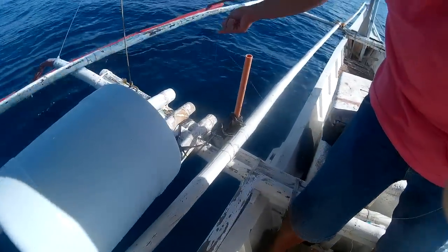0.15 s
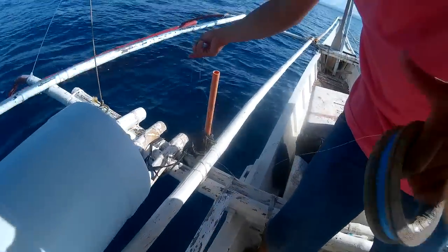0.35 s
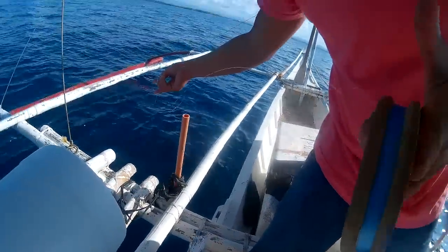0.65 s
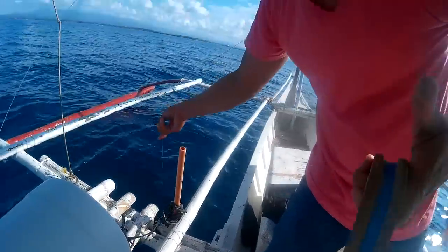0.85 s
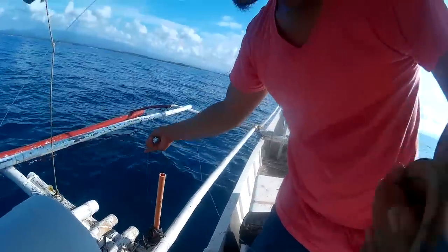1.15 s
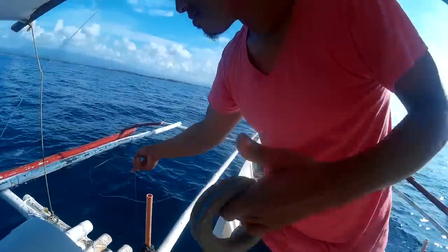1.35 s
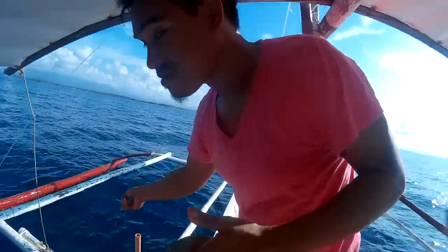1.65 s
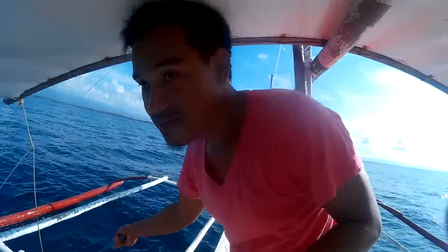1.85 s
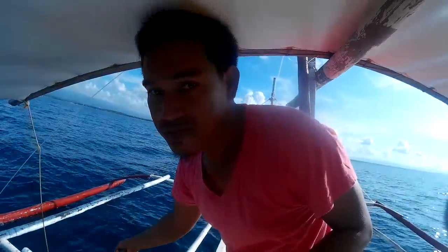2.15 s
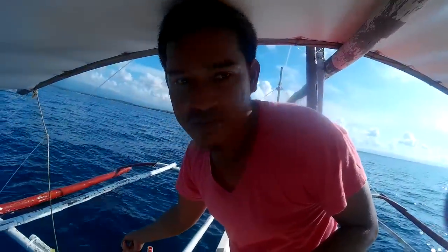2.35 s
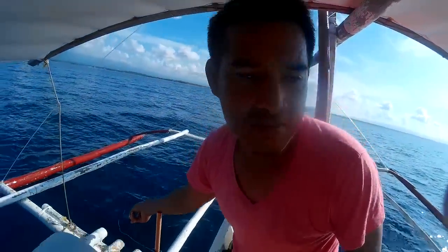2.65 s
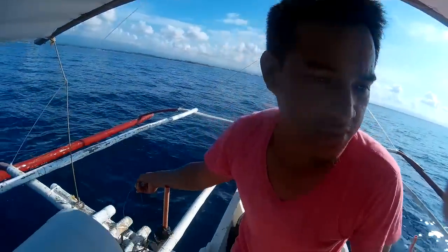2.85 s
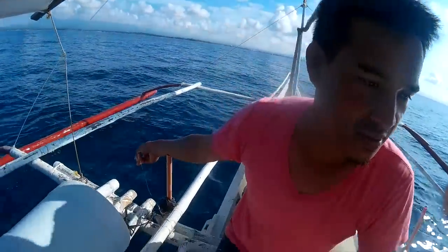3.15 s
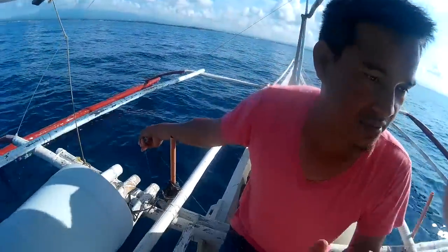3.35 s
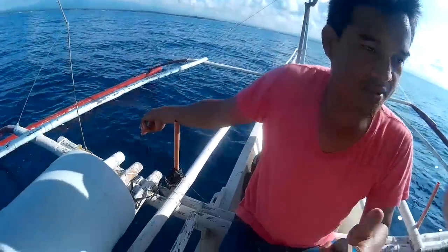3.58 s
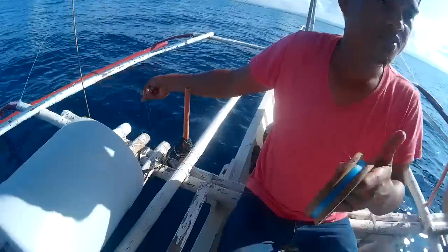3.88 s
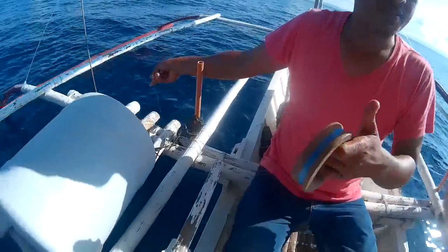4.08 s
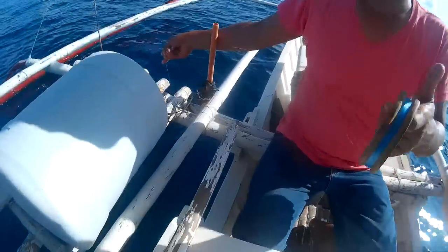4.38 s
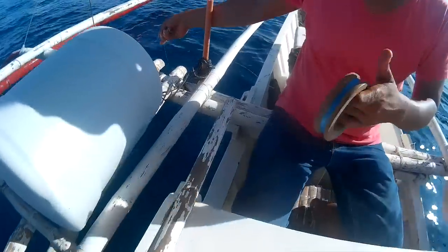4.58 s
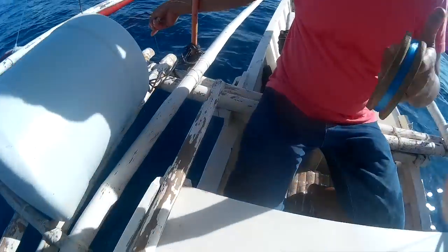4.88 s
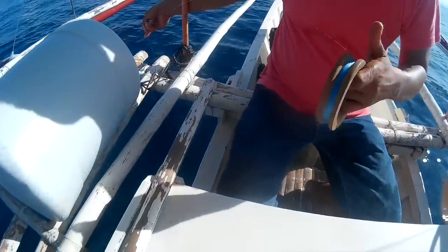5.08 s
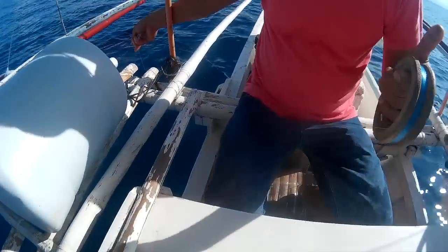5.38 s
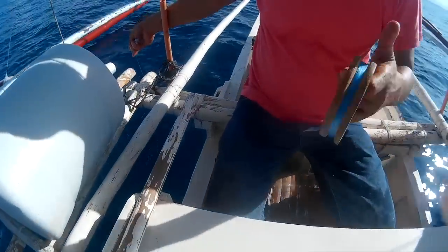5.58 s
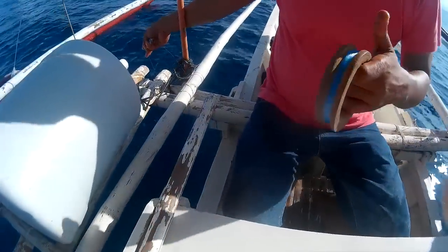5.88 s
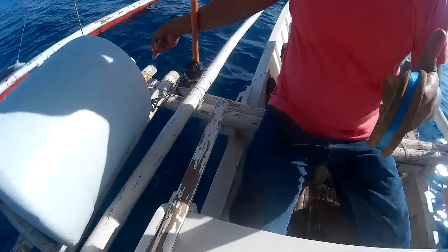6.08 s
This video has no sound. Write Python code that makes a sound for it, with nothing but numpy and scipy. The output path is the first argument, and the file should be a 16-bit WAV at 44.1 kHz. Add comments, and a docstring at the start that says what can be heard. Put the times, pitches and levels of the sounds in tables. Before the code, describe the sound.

Quiet water laps, splashes and bubbles against a small wooden boat, with two sharp, dry knocks close by.

```python
"""On a calm sea, in open air without echo, a small wooden outrigger drifts.
Wavelets wash and slap along the hull, throwing spray and trapping air that rings as bubbles.
Two sharp, dry knocks sound close by, each an impulse exciting heavily damped modes; later a large
air pocket gurgles, its resonance rising as it shrinks. A faint rumble and a thin hiss lie under it all."""
import sys
import numpy as np
from scipy import signal
from scipy.fft import rfft, irfft
from scipy.io import wavfile
from scipy.ndimage import uniform_filter1d

SR = 44100
rng = np.random.default_rng(int(sys.argv[2]) if len(sys.argv) > 2 else 0)


def int16_out(signal):
    """Quantize to a 16-bit WAV file."""
    q = np.round(np.clip(np.atleast_2d(signal).T, -1, 1) * 32767)
    wavfile.write(sys.argv[1], SR, q.astype(np.int16))


N = 274743
TIME = np.arange(N) / SR

# spectra of large bubbles, small bubbles and spray: (frequency [Hz], relative level [dB])
GULP_SPECTRUM = [(100, -14), (230, -3.5), (430, 0), (800, -3.5), (1100, -7.5), (1800, -28)]
SPLASH_SPECTRUM = [(600, -24), (1000, -4), (1450, -0.5), (1950, -1), (2700, -4), (3400, -15.5), (5000, -11),
                   (6200, -24.5), (8000, -35.5)]
SPRAY_SPECTRUM = [(2400, -19.5), (3200, -4), (4100, -4.5), (5200, 0), (7000, -8.5), (8200, -4.5),
                  (9300, -10), (10700, -6.5), (13000, -11.5), (16000, -14)]


def from_db(db):
    """Amplitude ratio: a factor of ten for every 20 dB."""
    return 10 ** (np.asarray(db) / 20)


def unit_rms(x):
    """Normalisation to unit mean power."""
    return x / np.sqrt(np.mean(x ** 2) + 1e-20)


def coloured(x, spectrum):
    """Spectral shaping: gains interpolated over log frequency, the result at unit power."""
    hz, db = np.transpose(spectrum)
    log_hz = np.log(np.arange(N // 2 + 1) * SR / N + 1e-3)
    gain = from_db(np.interp(log_hz, np.log(hz), db, left=-60, right=-60))
    return unit_rms(irfft(rfft(x) * gain, N))


def cut(x, hz, kind, order):
    """Butterworth filtering: a low- or high-pass with a maximally flat passband."""
    return signal.sosfilt(signal.butter(order, hz, kind, fs=SR, output="sos"), x + 1e-18)


def resonance(x, hz, width_hz):
    """Forced response of a damped oscillator, with unit gain at its centre frequency."""
    radius = np.exp(-np.pi * width_hz / SR)
    feedback = [1, -2 * radius * np.cos(2 * np.pi * hz / SR), radius ** 2]
    return signal.lfilter(np.array([1, 0, -1]) * (1 - radius ** 2) / 2, feedback, x + 1e-18)


def grains(per_s, spread_db):
    """Shot noise: impulses at random moments, mostly small, a few large."""
    sizes = from_db(spread_db * np.minimum(rng.exponential(1, N), 4)) * rng.choice([-1, 1], N)
    return sizes * (rng.random(N) < per_s / SR)


def froth(spectrum, per_s, spread_db, q, count=28):
    """Superposition of bubble resonances of quality factor q, struck at random and levelled in power."""
    clicks, owner = grains(per_s, spread_db), rng.integers(0, count, N)
    pitches = np.geomspace(spectrum[0][0], spectrum[-1][0], count)
    ringing = sum(resonance(clicks * (owner == k), hz, hz / q) for k, hz in enumerate(pitches))
    swarm = coloured(ringing, spectrum)
    return swarm / np.sqrt(uniform_filter1d(swarm ** 2, size=900) + 1e-4)


def surge(age, rise_s, decay_s):
    """Envelope of a transient: a quick rise, then exponential decay."""
    return (1 - np.exp(-age / rise_s)) * np.exp(-age / decay_s)


def background(rumble_db, hiss_db):
    """Stationary noise: the low rumble of the open sea and the even hiss of the microphone."""
    # spectra of the two noises: (frequency [Hz], relative level [dB])
    rumble_spectrum = [(15, -1), (30, -2.5), (60, -0.5), (90, -2), (150, 0), (250, -7), (400, -11),
                       (800, -24.5), (2500, -38)]
    hiss_spectrum = [(100, 3), (2500, 0.5), (5000, -0.5), (8000, -.5), (14000, 0), (15500, -4),
                     (16200, -14)]
    rumble = from_db(rumble_db) * coloured(rng.standard_normal(N), rumble_spectrum)
    hiss = from_db(hiss_db) * coloured(rng.standard_normal(N), hiss_spectrum)
    return rumble + hiss


def swell_envelopes(calm_deep_db, calm_light_db):
    """Incoherent sources add in power: swells over the calm set the deep and light wash amplitudes."""
    # swells along the hull: (crest time [s], length [s], deep level [dB], light level [dB])
    swells = [(.008, 0.025, -68, -61.5), (0.076, .045, -70, -59), (0.222, 0.14, -75, -71.5),
              (0.488, 0.057, -74.5, -73.5), (0.86, 0.082, -75.5, -67.5), (1.235, 0.034, -66, -82),
              (2.038, 0.029, -82, -74.5), (2.673, 0.065, -80.5, -77.5), (2.998, .12, -84, -78.5),
              (3.368, .03, -88, -74.5), (3.647, 0.034, -80, -72.5), (3.897, 0.14, -78, -72.5),
              (4.117, 0.031, -68, -70.5), (4.492, 0.094, -74, -69.5), (4.997, 0.37, -79.5, -77.5),
              (5.781, 0.079, -68.5, -68.5), (6.207, .03, -79, -68.5)]
    deep_power, light_power = from_db(calm_deep_db) ** 2, from_db(calm_light_db) ** 2
    for crest, length, deep_db, light_db in swells:
        width_s = length * np.where(TIME < crest, 0.76, 0.89)   # builds faster than it drains
        shape = np.exp(-((TIME - crest) / width_s) ** 2)
        deep_power += from_db(deep_db) ** 2 * shape
        light_power += from_db(light_db) ** 2 * shape
    return np.sqrt(deep_power), np.sqrt(light_power)


def wash(deep, light, deep_gain_db, light_gain_db, fizz_gain_db):
    """Amplitude modulation: bubble noise and fizz follow the swells sliding along the planks."""
    large = from_db(deep_gain_db) * deep * froth(GULP_SPECTRUM, per_s=1000, spread_db=3, q=18)
    small = from_db(light_gain_db) * light * froth(SPLASH_SPECTRUM, per_s=1200, spread_db=2.5, q=20)
    fizz = from_db(fizz_gain_db) * light * coloured(grains(per_s=900, spread_db=4), SPRAY_SPECTRUM)
    return large + small + fizz


def bubbles(rows, gain_db, life_cycles, roughness, octaves_per_life=0.056, unrest_hz=200, steady_db=-45):
    """Bubble resonance: the pitch rises towards the surface, and moving water roughens the note."""
    out = np.zeros(N)
    unrest = unit_rms(cut(rng.standard_normal((2, N)), unrest_hz, "low", order=2))
    for start, db, hz in rows:
        life_s = life_cycles / hz
        span = slice(*np.searchsorted(TIME, [start, start + 2 * life_s]))
        lives = (TIME[span] - start) / life_s
        envelope = lives * np.exp(-(2.07 * lives) ** 2)
        phase = 2 * np.pi * np.cumsum(hz * 2 ** (octaves_per_life * lives)) / SR
        shake = roughness * from_db((steady_db - db) / 2)   # strong bubbles ring more cleanly
        in_phase, quadrature = shake * unrest[:, span]
        note = (np.sin(phase) * (1 + in_phase) + np.cos(phase) * quadrature) / np.sqrt(1 + 2 * shake ** 2)
        out[span] += from_db(db + gain_db) * envelope / envelope.max(initial=1e-9) * note
    return out


def plops():
    """Free oscillation: single air pockets ring briefly, each at its natural frequency."""
    # single air bubbles: (time [s], relative peak level [dB], starting frequency [Hz])
    pockets = [(.004, -55, 1266), (.211, -57, 1550), (.801, -55, 1750), (.915, -63, 2300),
               (2.156, -66, 956), (3.635, -65, 2130), (3.77, -57, 1640), (3.905, -64, 745),
               (3.938, -56, 2180), (4.165, -62, 1200), (4.375, -61, 1070), (4.763, -50, 1800),
               (5.283, -66, 1950), (5.513, -56.5, 771), (5.814, -60, 440), (5.841, -53.5, 1817),
               (6.18, -58, 2750)]
    return bubbles(pockets, gain_db=0.5, life_cycles=23.3, roughness=0.21)


def trickle(light, gain_db, spread_db, low_hz, high_hz, count):
    """A random point process: tiny bubbles burst with amplitudes proportional to the light wash."""
    when, weakness, pitch = rng.random((count, 3)).T
    rows = zip(when * N / SR, -spread_db * weakness, low_hz * (high_hz / low_hz) ** pitch)
    return light * bubbles(rows, gain_db, life_cycles=12.4, roughness=0)


def slaps(gulp_gain_db, splash_gain_db, pocket_gain_db, pocket_q, rise_s, fine_from_db):
    """Impact and air entrainment: a wavelet throws spray and traps bubbles; large ones ring longest."""
    # wavelets striking the hull:
    # (time [s], relative level [dB], brightness [dB], splash decay time [s], pocket frequency [Hz])
    wavelets = [(.046, -55.5, -2, 0.016, 2220), (.064, -54, -2, 0.01, 1540), (0.075, -50, -0.5, .018, 1840),
                (.232, -58, -4.5, 0.0091, 1220), (0.534, -60.5, -4, .005, 3050),
                (.801, -63, -10, 0.013, 1760), (1.199, -65, -28, 0.015, 519),
                (3.845, -60.5, 1, 0.011, 1700), (3.865, -52, -12, 0.0078, 2540),
                (4.019, -59.5, -14.5, 0.0074, 2100), (4.112, -57.5, -3.5, 0.019, 572),
                (4.21, -58.5, -8, 0.0069, 2800), (4.245, -61, -29, 0.018, 1490),
                (4.523, -60, -8, .0085, 1850), (5.269, -65.5, -4, 0.017, 2620),
                (5.414, -60.5, 7.5, .01, 1840), (5.424, -49.5, -2, 0.013, 2800),
                (5.432, -49, -9, 0.011, 1960), (5.483, -63.5, 4.5, .035, 1790),
                (5.509, -58, -1, 0.013, 765), (5.654, -58, -4.5, 0.015, 1066),
                (5.814, -60.5, -5, 0.02, 433), (5.842, -53.5, -16.5, 0.0052, 1810),
                (6.208, -65, 6, 0.0066, 1650)]
    gulp_power, splash_power, spray_power, pockets = np.zeros((4, N))
    for start, splash_db, brightness_db, decay_s, hz in wavelets:
        gulp_db = splash_db - 0.23 * brightness_db - 4 * np.log2(hz / 500.4)   # less if bright or small
        span = (TIME >= start) & (TIME < start + .2)
        age = TIME[span] - start
        gulp_power[span] += (from_db(gulp_db) * surge(age / 1.8, rise_s, decay_s)) ** 2
        splash_power[span] += (from_db(splash_db) * surge(age, rise_s, decay_s)) ** 2
        spray_power[span] += (from_db(splash_db + brightness_db) * surge(age / 0.86, rise_s, decay_s)) ** 2
        # trapped air rings unsteadily; a deep pocket goes with the gulp, a small one with the splash
        ringing = resonance(rng.standard_normal(len(age)), hz, hz / pocket_q)
        note = np.cos(np.angle(signal.hilbert(ringing)))
        pocket_db = np.interp(hz, [700, 1300], [gulp_db + gulp_gain_db, splash_db])
        pockets[span] += from_db(pocket_db + pocket_gain_db) * surge(age, rise_s, decay_s) * note
    # only a hard slap tears the water into the finest, brightest drops
    fine = coloured(grains(per_s=5300, spread_db=6.5), SPRAY_SPECTRUM)
    coarse = cut(coloured(grains(per_s=6100, spread_db=0), SPRAY_SPECTRUM), 5640, "low", order=6)
    fine_share = spray_power / (spray_power + from_db(fine_from_db) ** 2)
    spray = np.sqrt(spray_power) * (np.sqrt(fine_share) * fine + np.sqrt(1 - fine_share) * coarse)
    gulp = np.sqrt(gulp_power) * froth(GULP_SPECTRUM, per_s=1000, spread_db=1.5, q=12)
    splash = np.sqrt(splash_power) * froth(SPLASH_SPECTRUM, per_s=1400, spread_db=2.5, q=22)
    return from_db(gulp_gain_db) * gulp + from_db(splash_gain_db) * splash + spray + pockets


def spray_ticks(rise_s, decay_s):
    """Drop impact: each fleck of spray lands with a very short burst of bright shot noise."""
    # flecks landing: (time [s], level [dB])
    flecks = [(0.087, -44.5), (.125, -53.5), (0.488, -57), (.989, -60.5), (1.069, -63), (1.137, -63),
              (3.625, -59), (5.429, -46)]
    envelope = sum(from_db(db) * surge(np.maximum(TIME - start, 0), rise_s, decay_s) for start, db in flecks)
    return envelope * coloured(grains(per_s=9000, spread_db=3.5), SPRAY_SPECTRUM)


def knocks(bass_cut_hz):
    """Impulse response: a blow excites heavily damped modes, alternate ones in opposite sign."""
    # blows: (time [s], impulse level [dB], part struck)
    blows = [(1.3076, -0.5, "hard"), (1.5275, -0.5, "dull")]
    # modes of a hard fixture and of a dull wooden part: (frequency [Hz], bandwidth [Hz], gain [dB])
    hard_modes = [(560.0, 1700, 11.5), (1200, 980.0, 15), (1990.0, 280, 13.5), (2411, 270, 15.5),
                  (4540.0, 280.0, 7.5), (5273, 400, 14), (6310.0, 730, 18.5), (8550, 440.0, -2.0),
                  (9980.0, 1630.0, 0.5), (13080.0, 1080.0, -0.5), (13710.0, 650.0, 2.5)]
    dull_modes = [(440.0, 1320.0, 16), (1200, 1345, 20.0), (1840, 690, 19), (2490, 133, 5.5),
                  (3990.0, 2240, -5.5), (5070.0, 1640.0, -3.5), (7900, 450, -22), (12210, 450.0, -15.5)]
    out = np.zeros(N)
    for start, impulse_db, part in blows:
        impulse = np.zeros(N)
        impulse[round(start * SR)] = from_db(impulse_db)
        for k, (hz, width_hz, db) in enumerate(hard_modes if part == "hard" else dull_modes):
            out += (-1) ** k * from_db(db) * resonance(impulse, hz, width_hz)
    return cut(out, bass_cut_hz, "high", order=1)


def gurgle(start_s, hold_s, climb_s, hz, climb_octaves, flare_hz, throb_hz, churn_db, fizz_db):
    """Resonance rises as volume falls: a pocket holds its note, then climbs as its air is squeezed out."""
    age = TIME - start_s
    held = np.clip(age / hold_s, 0, 1)
    climbed = np.clip((age - hold_s) / climb_s, 0, 1)
    octaves = climb_octaves * climbed ** 1.25
    flare = np.exp(-((octaves - np.log2(flare_hz / hz)) / 0.23) ** 2)   # louder in passing this pitch
    level_db = np.where(held < 1, -46 + 3.5 * held, -49.5 - 15 * climbed + 9 * flare)
    gate = np.clip(np.minimum(age, hold_s + climb_s - age) / .0012, 0, 1)
    envelope = from_db(level_db) * gate
    squeeze = np.minimum(2 ** octaves - 1, .5)
    shudder, waver = squeeze * unit_rms(cut(rng.standard_normal((2, N)), 450, "low", order=2))
    pitch_hz = hz * 2 ** (octaves + 0.28 * waver)
    throb = 1 + 0.98 * squeeze * np.cos(2 * np.pi * throb_hz * (age - hold_s))   # air leaves in gulps
    note = envelope * throb * (1 + 0.63 * shudder) * np.sin(2 * np.pi * np.cumsum(pitch_hz) / SR)
    activity = envelope / envelope.max()
    churn = cut(froth(SPLASH_SPECTRUM, per_s=1800, spread_db=9, q=4.4), 1250, "low", order=2)
    fizz = coloured(grains(per_s=570, spread_db=1), SPRAY_SPECTRUM)
    return note + from_db(churn_db) * activity ** 0.18 * churn + from_db(fizz_db) * activity * fizz


def scene():
    """Linear superposition: water, knocks and background add in one channel."""
    deep, light = swell_envelopes(calm_deep_db=-78, calm_light_db=-82)
    water = wash(deep, light, deep_gain_db=1, light_gain_db=-1, fizz_gain_db=-12.5)
    water += slaps(gulp_gain_db=-3, splash_gain_db=-1.5, pocket_gain_db=1.5, pocket_q=18,
                   rise_s=0.00098, fine_from_db=-67)
    water += spray_ticks(rise_s=0.00035, decay_s=0.0039) + plops()
    water += trickle(light, gain_db=10, spread_db=13, low_hz=1700, high_hz=5600, count=130)
    water += gurgle(start_s=4.2103, hold_s=.022, climb_s=0.07, hz=820, climb_octaves=1.62,
                    flare_hz=1630, throb_hz=93.5, churn_db=-62.5, fizz_db=-73)
    return (water + knocks(bass_cut_hz=110) + background(rumble_db=-70.5, hiss_db=-71.5))[None]


def record(dry):
    """Band limiting: a steep low-pass, 60 dB down from 16850 Hz."""
    return signal.sosfilt(signal.cheby2(14, 60, 16850, fs=SR, output="sos"), dry)


dry = scene()
out = record(dry)
int16_out(out)
```